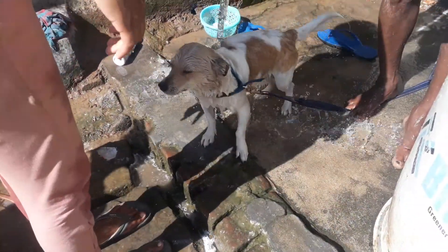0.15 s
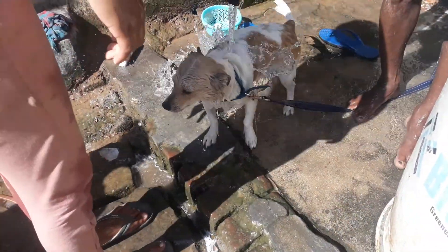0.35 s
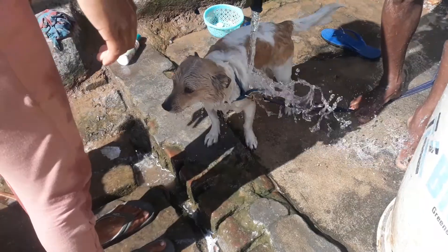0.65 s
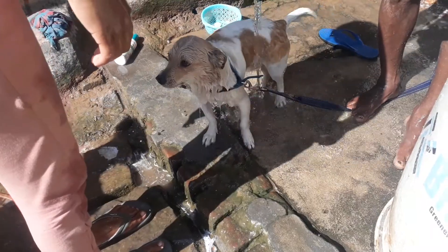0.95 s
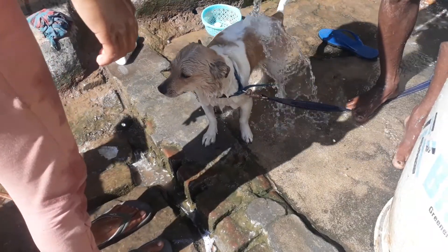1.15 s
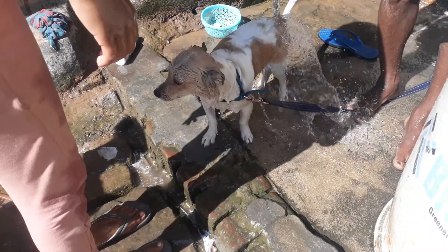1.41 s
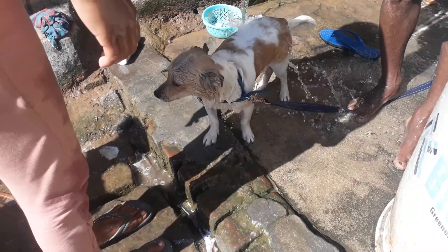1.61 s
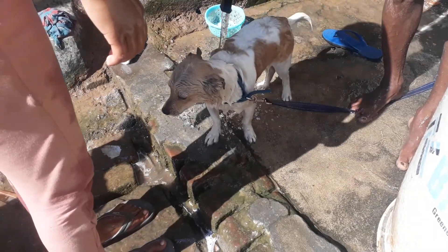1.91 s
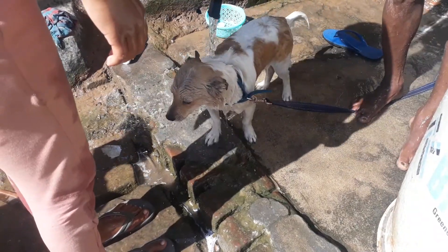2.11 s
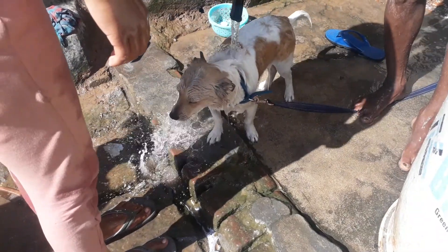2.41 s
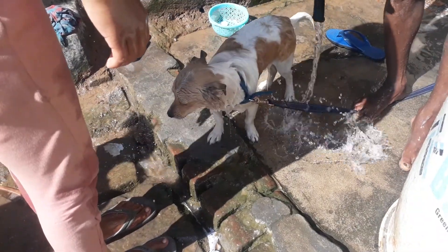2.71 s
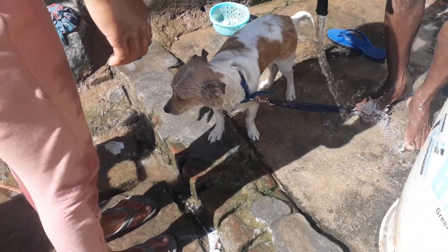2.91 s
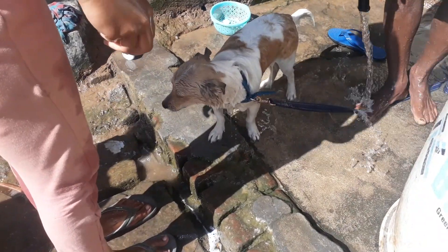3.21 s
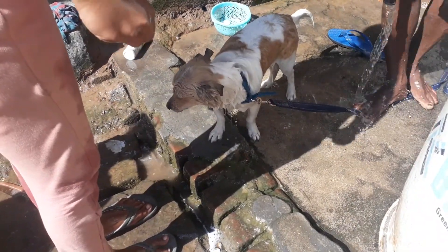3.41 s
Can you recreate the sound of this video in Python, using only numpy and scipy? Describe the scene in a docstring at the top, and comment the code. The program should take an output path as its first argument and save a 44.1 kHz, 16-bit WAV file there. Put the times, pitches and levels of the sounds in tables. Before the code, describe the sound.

Hose water pouring over a dog spatters and trickles onto wet stone, close by.

```python
"""Hosing down a dog

Water from a hose pours over a dog's back and falls on stone paving, close by and outdoors.
A dense spray of droplets swells as the stream slips off the coat and hits the stone. Fat drops slap,
gushes thud, air pockets gurgle and bubbles ring in the puddles. The ground and nearby walls return
a short echo, and a faint outdoor rumble lies underneath."""
import sys
import numpy as np
from scipy import signal
from scipy.fft import rfft, irfft
from scipy.io import wavfile

SR = 44100
rng = np.random.default_rng(int(sys.argv[2]) if len(sys.argv) > 2 else 0)


def wav_out(sig):
    """Save sig, one row per channel (or a flat mono array), as 16-bit PCM at SR to the path in sys.argv[1]."""
    wavfile.write(sys.argv[1], SR, np.round(np.clip(np.atleast_2d(sig).T, -1, 1) * 32767).astype(np.int16))


N = 156555

# tone of the outdoor bed (frequency [Hz], relative level [dB])
AIR_SPECTRUM = [(20, -6), (45, -22), (70, -7), (100, -3.5), (140, -6.5), (205, -6), (300, -12), (600, -11),
                (1500, -12), (8000, -34)]
# gushes landing with a thud (time [s], level [dB], decay [s], upper edge [Hz])
GUSHES = [(.21, -57, 0.053, 900), (.79, -50.5, 0.029, 900), (1.806, -45.5, 0.027, 900),
          (2.761, -36, .0035, 3200), (3.345, -43.5, 0.01, 1100)]
# gurgling air pockets (time [s], length [s], start pitch [Hz], end pitch [Hz], level [dB])
AIR_POCKETS = [(2.861, .034, 1950, 1380, -34), (3.15, .025, 600, 760, -52), (3.347, .055, 200, 215, -49)]
# large bubbles in the puddles (time [s], start pitch [Hz], relative level [dB])
LARGE_BUBBLES = [(.021, 3330, -18.5), (.057, 636, -41.5), (0.174, 1890, -30.5), (0.274, 1810, -29),
                 (.395, 4820, -14), (0.465, 1240, -35), (.532, 2360, -15.5), (0.668, 1770, -25.5),
                 (0.7395, 1910, -17), (0.813, 1540, -19), (1.025, 1240, -27), (1.05, 1590, -24),
                 (1.117, 3810, -13), (1.228, 4240, -24), (1.282, 3510, -21.5), (1.332, 3650, -12),
                 (1.403, 2920, -13), (1.523, 2340, -20), (1.585, 3000, -12), (1.668, 3910, -14),
                 (2.206, 950, -41), (2.697, 1490, -28), (2.711, 1280, -35), (2.786, 2420, -19),
                 (2.8128, 3370, -18), (3.048, 2450, -23.5), (3.088, 1207, -30), (3.101, 1400, -33),
                 (3.233, 1930, -26), (3.293, 2390, -22), (3.345, 1140, -37)]
# tone of water hitting stone (frequency [Hz], relative level [dB])
SPLASH_SPECTRUM = [(100, -52), (200, -25), (400, -27), (650, -19.5), (900, -25), (1500, -17.5), (2200, -11),
                   (3000, -6), (4100, 1.5), (5400, -7), (6400, 1.5), (7200, 2), (8000, -5.5), (8700, -6),
                   (9500, -14), (10600, -8), (12500, -8.5), (16000, -17)]
# lumps of water bursting into droplets (time [s], fine level [dB], coarse level [dB])
WATER_LUMPS = [(.149, -18.5, -31), (.222, -24.5, -22.5), (.719, -22, -30), (.740, -18, -28.5),
               (1.163, -25.5, -36), (1.439, -22.5, -29), (1.594, -25.5, -29.5), (1.648, -22.5, -34),
               (1.674, -23.5, -38), (1.819, -23, -29), (2.454, -34, -27.5), (2.845, -29, -30.5),
               (3.011, -25, -29), (3.372, -27, -41), (3.399, -25, -44)]
# fat drops slapping the stone (time [s], relative crack level [dB], relative body level [dB])
FAT_DROPS = [(0.021, -28, -25), (0.0869, -26, -34), (0.1166, -26, -27), (0.2045, -26, -28),
             (0.2519, -25, -28), (0.3458, -22, -29), (0.3951, -26, -29), (0.4642, -26, -38),
             (0.5323, -35, -27), (0.5637, -26, -26), (0.5779, -25, -23), (0.6178, -24, -28),
             (0.6282, -24, -31), (0.6441, -23, -34), (0.6625, -22, -33), (0.669, -24, -30),
             (0.698, -29, -30), (0.7608, -24, -30), (0.7802, -15, -21), (0.7935, -21, -20), (0.8, -18, -23),
             (0.837, -25, -26), (0.8618, -23, -36), (0.951, -29, -33), (1.0311, -26, -28),
             (1.0784, -26, -25), (1.098, -27, -27), (1.1174, -30, -22), (1.1496, -28, -25),
             (1.2276, -31, -22), (1.2495, -23, -31), (1.2573, -24, -30), (1.317, -23, -30),
             (1.3795, -24, -34), (1.3973, -19, -29), (1.4209, -23, -23), (1.5499, -26, -28),
             (1.5861, -25, -25), (1.6312, -22, -32), (1.7438, -23, -35), (1.807, -31, -33),
             (1.9423, -26, -27), (1.9806, -20, -28), (2.009, -29, -31), (2.0982, -21, -30),
             (2.1093, -24, -32), (2.1704, -32, -30), (2.3853, -16, -34), (2.5321, -21, -25),
             (2.65, -31, -29), (2.7616, -17, -22), (2.8928, -22, -27), (3.244, -30, -34),
             (3.4207, -19, -39), (3.4948, -27, -40)]
# swell of the falling spray (time [s], relative fine level [dB], relative coarse level [dB])
SPRAY_FLOW = [(0, -33, -34), (0.099, -36.5, -41.5), (0.123, -26.5, -31.5), (0.194, -34.5, -41),
              (0.215, -23, -23.5), (0.259, -26, -31), (0.31, -34, -36.5), (0.4, -29.5, -35.5),
              (0.531, -36.5, -32), (0.579, -29, -36), (0.68, -29.5, -36), (0.71, -27.5, -29),
              (0.75, -27.5, -29), (0.777, -31, -36), (0.782, -20, -26), (0.815, -20, -24.5),
              (0.86, -25, -32), (0.895, -34, -38.5), (1.011, -31.5, -33), (1.091, -30.5, -34.5),
              (1.15, -26, -30.5), (1.21, -29.5, -42.5), (1.33, -23, -30.5), (1.371, -25.5, -44.5),
              (1.43, -23, -30), (1.5, -28, -31.5), (1.59, -29, -31.5), (1.69, -29.5, -35),
              (1.77, -39.5, -48), (1.798, -52, -47.5), (1.818, -22.5, -27.5), (1.91, -35, -36),
              (1.96, -34, -36), (2.06, -31, -39), (2.114, -29.5, -40.5), (2.16, -37.5, -42),
              (2.241, -37, -45), (2.286, -26, -36.5), (2.42, -26.5, -29), (2.52, -26, -29),
              (2.61, -34, -41.5), (2.679, -30.5, -35), (2.738, -44, -50), (2.759, -29.5, -44),
              (2.763, -19.5, -25.5), (2.853, -20.5, -24.5), (2.88, -32, -36), (2.92, -28, -34),
              (2.979, -34, -41), (3.011, -29.5, -35), (3.041, -35, -40), (3.148, -37.5, -39.5),
              (3.238, -38.5, -45.5), (3.25, -27, -33.5), (3.319, -29, -31.5), (3.41, -25, -32.5),
              (3.55, -33, -34.5)]

SPLIT_HZ = 5000  # the splash has two bands: fine above, coarse below
FINE_TINT_HZ, COARSE_TINT_HZ, DROP_TINT_HZ = (4710, 16000), (1780, 5300), (2480, 4600)  # crater rings


def undb(db):
    """Decibels to gain."""
    return 10 ** (np.asarray(db) / 20)


def unit(x):
    """Scale to an energy of 1."""
    return x / np.sqrt(np.sum(x ** 2))


def convolve(x, response):
    """Filter by a response, keeping the length."""
    return signal.fftconvolve(x, response)[:len(x)]


def add(out, at, sound):
    """Mix a sound in at a time in seconds."""
    i = int(np.clip(at * SR, 0, N - 1))
    out[i:i + len(sound)] += sound[:N - i]


def colour(spectrum, band="all", size=2048):
    """Impulse response of an EQ curve: all of it, its fine band or its coarse band."""
    hz, db = np.array(spectrum).T
    bins_hz = np.maximum(np.fft.rfftfreq(size, 1 / SR), 1)
    above = 1 / (1 + (SPLIT_HZ / bins_hz) ** 12)
    share = {"all": 1, "fine": above, "coarse": 1 - above}[band]
    gain = undb(np.interp(np.log(bins_hz), np.log(hz), db)) * np.sqrt(share + 1e-8)
    cepstrum = irfft(np.log(gain))
    cepstrum[1:size // 2] *= 2  # minimum phase keeps the attacks crisp
    cepstrum[size // 2 + 1:] = 0
    return unit(irfft(np.exp(rfft(cepstrum))))


def resonance(x, hz, q):
    """A band-pass with a gain of 1 at its centre."""
    angle = 2 * np.pi * min(hz, SR / 2 - 1) / SR
    width = np.sin(angle) / (2 * q)
    return signal.lfilter([width, 0, -width], [1 + width, -2 * np.cos(angle), 1 - width], x)


def burst(decay_s):
    """Noise that starts at once and dies away, with an energy of 1."""
    t = np.arange(int(np.log(1000) * decay_s * SR) + 2) / SR
    return unit(rng.standard_normal(len(t)) * np.exp(-t / decay_s))


def strengths(count, spread_db):
    """Random gains: many soft hits and a few loud ones."""
    return undb(spread_db * np.minimum(rng.exponential(size=count), 3.5))


def outdoor_air(start_db=-61.5, swell_db_per_s=1):
    """A faint bed of rumbling noise that slowly swells."""
    rumble = convolve(rng.standard_normal(N), colour(AIR_SPECTRUM))
    return undb(start_db + swell_db_per_s * np.arange(N) / SR) * rumble


def yard_echo(x):
    """The walls around the paving return a faint, short tail."""
    response = np.zeros(N)
    add(response, at=.008, sound=undb(-16) * burst(decay_s=.035))
    response[0] += 1
    return convolve(x, unit(response))


def gushes(low_hz=150):
    """A mass of water landing at once gives a dull thud, or a short smack on bare stone."""
    out = np.zeros(N)
    for start, db, decay_s, top_hz in GUSHES:
        band = signal.butter(2, [low_hz, top_hz], "band", fs=SR, output="sos")
        thud = unit(signal.sosfilt(band, burst(decay_s)))
        add(out, start, undb(db) * np.sqrt(decay_s * SR / 2) * thud)
    return out


def gurgles():
    """A pocket of air in the water swells and fades, its pitch sliding as it changes size."""
    out = np.zeros(N)
    for start, length, from_hz, to_hz, db in AIR_POCKETS:
        age = np.linspace(0, 1, int(length * SR))
        hz = from_hz * (to_hz / from_hz) ** age
        envelope = np.sin(np.pi * np.sqrt(age)) ** 2  # quick swell, slower fade
        add(out, start, undb(db) * envelope * np.sin(2 * np.pi * np.cumsum(hz) / SR))
    return out


def bubble(hz, cycles, rise=.03, pop_cycles=3):
    """A bubble pinches off with a pop, rings briefly and rises in pitch; the stones scatter the ring."""
    decay_s = cycles / hz
    age = np.arange(int(np.log(1000) * decay_s * SR)) / SR / decay_s  # in decay times
    envelope = np.exp(-age) * (1 - np.exp(-age * cycles))
    ring = envelope * np.sin(2 * np.pi * cycles * (age + rise * age ** 2 / 2))
    noise = resonance(rng.standard_normal(len(age)), hz, q=2.2)
    pop = undb(-12) * noise / noise.std() * np.exp(-age * cycles / pop_cycles)
    paths = undb(-8) * burst(decay_s=.006)
    paths[0] += 1
    return signal.fftconvolve(ring + pop, unit(paths))


def puddles(fizz_per_s=320, low_hz=1200, high_hz=5280, tilt_db_per_octave=9.5):
    """Large bubbles plink, high ones for more cycles; small ones fizz as loud as the flow drives them."""
    out = np.zeros(N)
    for start, hz, db in LARGE_BUBBLES:
        add(out, start, undb(db + .3) * bubble(hz, cycles=4.4 * np.sqrt(hz / 1000)))
    times, _, coarse_db = np.array(SPRAY_FLOW).T
    count = int(fizz_per_s * N / SR)
    for (when, pitch), strength in zip(rng.random((count, 2)), strengths(count, spread_db=3.3)):
        start, hz = when * N / SR, low_hz + pitch * (high_hz - low_hz)
        db = np.interp(start, times, coarse_db) + 7.5 + tilt_db_per_octave * np.log2(hz / high_hz)
        add(out, start, strength * undb(db) * bubble(hz, cycles=5))
    return out


def impact(spatter_s=.0008, mist_db=-4):
    """One drop hits the stone: a click, a short burst of spatter, then a fading mist."""
    spatter = burst(spatter_s)
    mist = undb(mist_db) * burst(decay_s=.0083)
    sound = np.zeros(max(len(spatter), len(mist)))
    sound[:len(spatter)] += spatter
    sound[:len(mist)] += mist
    sound[0] += undb(-6.5)  # the click
    return unit(sound)


def tinted(sound, hz):
    """Give an impact the ring of its own splash crater."""
    return unit(sound + undb(7) * resonance(sound, hz, q=5.75))


def splat(centre, tint_hz, count=16, scatter_s=.0045):
    """A lump of water breaks into droplets that land around one moment, the largest in the middle."""
    out = np.zeros(N)
    lags = np.linspace(-2, 2, count) + rng.uniform(-1, 1, count) * 2 / count
    for lag, hz in zip(lags, rng.uniform(*tint_hz, count)):
        add(out, centre + lag * scatter_s, np.exp(-abs(lag)) * tinted(impact(), hz))
    return unit(out) * np.sqrt(2 * scatter_s * SR)


def spray(flow_db, per_s, spread_db, tint_hz, per_cluster=3, scatter_s=.003):
    """Droplets patter in small clusters at the level of the flow: crowded in a gush, sparse in a lull."""
    out = np.zeros(N)
    clusters = int(per_s * N / SR / per_cluster)
    count = clusters * per_cluster
    density = np.sqrt(undb(flow_db))
    centres = np.searchsorted(np.cumsum(density) / density.sum(), rng.random(clusters)) / SR
    starts = np.repeat(centres, per_cluster) + scatter_s * rng.standard_normal(count)
    for start, hz, strength in zip(starts, rng.uniform(*tint_hz, count), strengths(count, spread_db)):
        add(out, start, strength * tinted(impact(mist_db=2.5), hz))
    levelled = unit(out / np.sqrt(density)) * np.sqrt(N)  # crowding sets texture, flow sets loudness
    return levelled * undb(flow_db)


def splash():
    """Fine and coarse spray ride the flow; fat drops and bursting lumps of water cut through it."""
    t = np.arange(N) / SR
    times, fine_db, coarse_db = np.array(SPRAY_FLOW).T
    fine = spray(np.interp(t, times, fine_db) - 1.5, per_s=1800, spread_db=6, tint_hz=FINE_TINT_HZ)
    coarse = spray(np.interp(t, times, coarse_db) - 6.2, per_s=720, spread_db=4.5, tint_hz=COARSE_TINT_HZ)
    drop_gain = np.sqrt(.0045 * SR)  # a slap packs the energy of 4.5 ms at its level
    for (start, crack_db, body_db), hz in zip(FAT_DROPS, rng.uniform(*DROP_TINT_HZ, len(FAT_DROPS))):
        slap = impact(spatter_s=.0016)
        add(fine, start, drop_gain * undb(crack_db + .5) * slap)
        add(coarse, start, drop_gain * undb(body_db - 3.5) * tinted(slap, hz))
    for centre, spatter_db, body_db in WATER_LUMPS:
        fine += undb(spatter_db) * splat(centre, FINE_TINT_HZ)
        coarse += undb(body_db) * splat(centre, COARSE_TINT_HZ)
    sizzle = convolve(fine, colour(SPLASH_SPECTRUM, "fine"))
    body = convolve(coarse, colour(SPLASH_SPECTRUM, "coarse"))
    return sizzle + body


def scene():
    """The water in its yard over the outdoor bed, in mono."""
    air = outdoor_air()
    water = splash() + puddles() + gurgles() + gushes()
    return (yard_echo(water) + air)[None]


def record(dry):
    """A steep low-pass trims the very top."""
    return signal.sosfilt(signal.ellip(10, .2, 70, 15900, fs=SR, output="sos"), dry)


dry = scene()
out = record(dry)
wav_out(out)
```